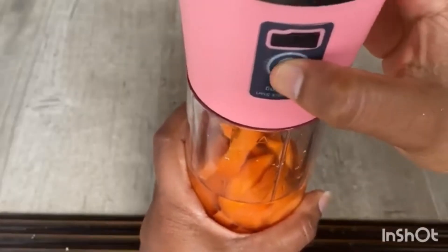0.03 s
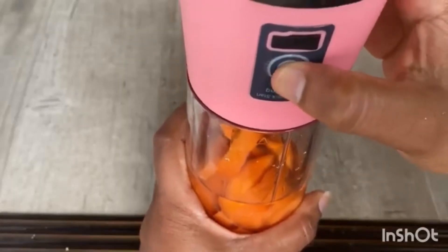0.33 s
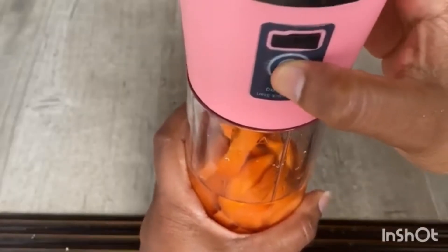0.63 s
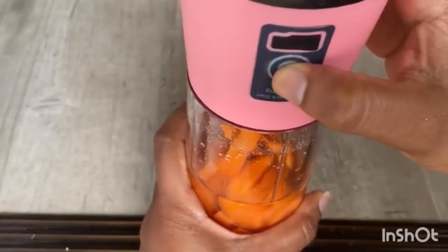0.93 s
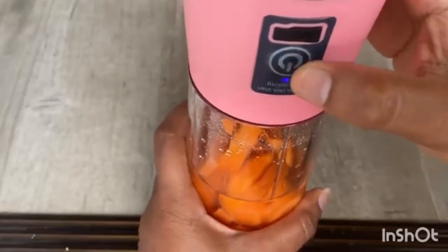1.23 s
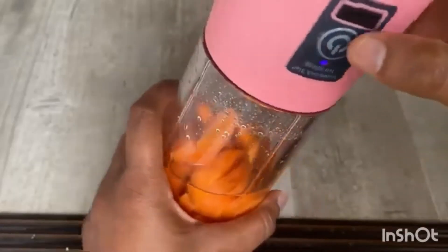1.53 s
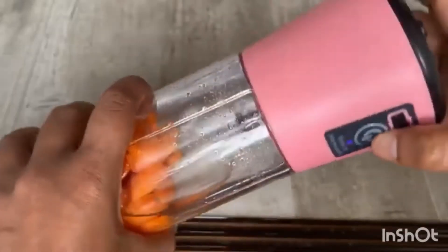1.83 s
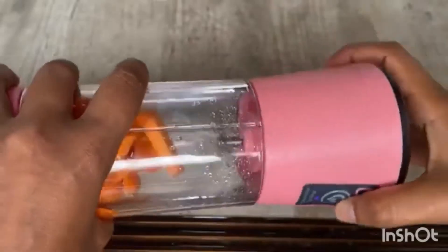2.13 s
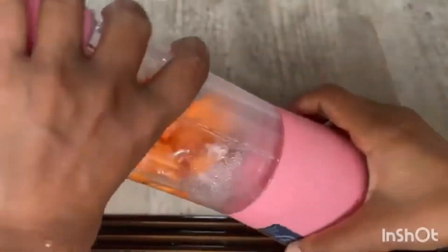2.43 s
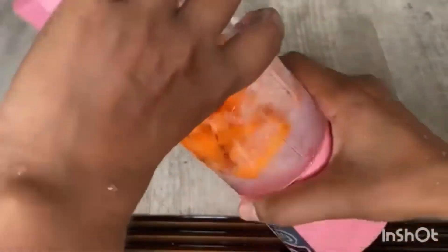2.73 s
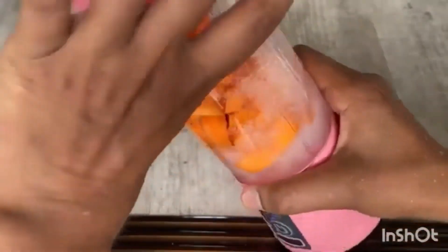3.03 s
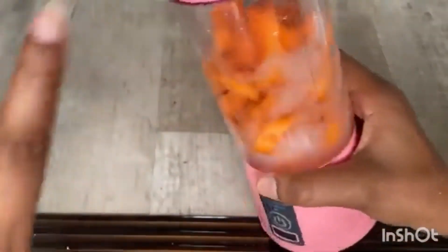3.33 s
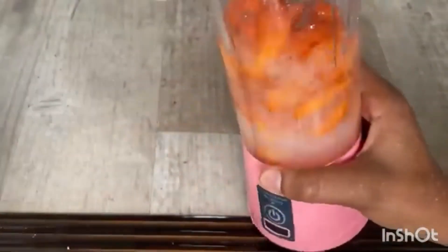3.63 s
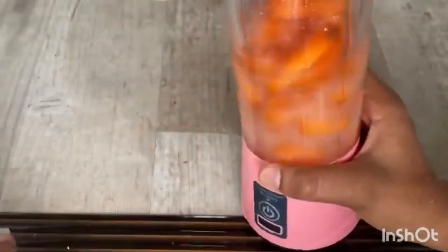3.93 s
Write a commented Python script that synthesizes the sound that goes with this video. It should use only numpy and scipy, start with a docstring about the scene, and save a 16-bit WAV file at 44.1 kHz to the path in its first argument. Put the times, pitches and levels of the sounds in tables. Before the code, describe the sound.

Close up in a quiet room, a portable blender starts after three button clicks. Its rising whine holds steady, then sinks into a harsh buzz as fruit meets the blades, which chop and slosh it around the plastic jar.

```python
"""A quiet room, with a small cordless blender held close to the microphone. Its button clicks three times,
then the motor whines up and spins free: unbalance hums, the commutator sings through the case.
As the jar is tipped over, fruit reaches the blades, which rattle against it and drag the speed down.
Finally they chop and churn the pieces, and the pulp bubbles, gulps and sloshes in the plastic jar."""
import sys
import numpy as np
from scipy import signal
from scipy.fft import rfft, irfft
from scipy.io import wavfile
from scipy.ndimage import uniform_filter1d

SR = 44100
rng = np.random.default_rng(int(sys.argv[2]) if len(sys.argv) > 2 else 0)


def dump(signal):
    """Clip the signal to [-1, 1] and save it as 16-bit WAV at the path in sys.argv[1]."""
    limited = np.clip(np.atleast_2d(signal).T, -1, 1)
    pcm = np.round(limited * 32767).astype(np.int16)
    wavfile.write(sys.argv[1], SR, pcm)


N = 176400
T = np.arange(N) / SR
HZ = np.fft.rfftfreq(N, 1 / SR)

# Fader rides, one for each layer. Each row: time in seconds, relative level in dB.
HANDLING_RIDE = [(1.2, -71.5), (1.55, -67), (2.2, -66.5), (2.45, -61.5), (4, -59)]
HUM_RIDE = [(.8, -32), (.86, -23), (1, -12), (1.5, -3), (2.15, -2), (2.6, -11), (3, -7), (3.3, -16)]
WHINE_RIDE = [(.8, -40), (.94, -16), (1.02, -3), (1.2, 1), (1.5, -0.5), (2.1, -1), (2.35, -10), (3, -25)]
BRUSH_RIDE = [(.79, -85), (.82, -62), (.86, -51), (.94, -47), (1.02, -52), (1.15, -60), (1.4, -61),
              (1.55, -66), (2, -66), (2.2, -55), (4, -56)]
LOW_RING_RIDE = [(1, -71), (1.35, -67), (1.47, -53), (1.8, -51.5), (2, -64), (2.2, -59)]  # the case sings near 3.2 kHz as it tilts
HIGH_RING_RIDE = [(.95, -74), (1.05, -58), (1.33, -53), (1.5, -44), (1.76, -45), (1.84, -51), (1.94, -43),
                  (2.2, -55)]  # and near 5.3 kHz
GROAN_RIDE = [(.83, -28), (.86, -8), (1.1, -30), (2.1, -28), (2.25, 0), (2.5, 0), (2.68, -20), (4, -30)]
GROWL_RIDE = [(2.1, -41), (2.28, -18), (2.45, -8), (2.6, 4), (2.7, 2), (2.8, -2.5), (2.95, 1), (3.06, -2),
              (3.15, -24), (4, -14)]
BUZZ_RIDE = [(2.05, -45), (2.25, -16), (2.4, -13), (2.5, -4), (2.6, 0), (2.7, 0), (2.79, -3), (2.88, -1),
             (2.97, -2), (3.06, -7), (3.15, -24), (4, -28)]
SCRAPE_RIDE = [(2.02, -100), (2.09, -53), (2.19, -46.5), (2.28, -37.5), (2.35, -36.5), (2.41, -45),
               (2.44, -26.5), (2.47, -43), (2.49, -26), (2.51, -50), (2.535, -34), (2.57, -39.5),
               (2.66, -42.5), (2.78, -37), (2.9, -39.5), (3, -34), (3.09, -34), (3.16, -58), (4, -59)]
CHURN_RIDE = [(2.95, -46.5), (3.06, -36), (3.085, -29), (3.115, -33.5), (3.15, -41.5), (3.18, -39),
              (3.205, -33.5), (3.235, -36), (3.3, -32), (3.355, -35), (3.39, -32.5), (3.44, -31.5),
              (3.465, -37.5), (3.515, -33.5), (3.545, -36), (3.575, -32.5), (3.625, -34.5), (3.69, -33.5),
              (3.735, -29.5), (3.795, -37.5), (3.84, -32.5), (3.89, -34.5), (3.95, -33.5), (4, -41.5)]
SLOSH_RIDE = [(2.1, -68.5), (2.45, -47.5), (2.55, -60), (3.06, -58), (3.115, -29.5), (3.16, -48),
              (3.4, -34), (3.49, -52), (3.575, -33), (3.66, -38.5), (3.735, -27), (3.79, -39), (3.84, -34),
              (4, -40.5)]

# EQ curves of the sources and the bodies they ring. Each row: frequency in Hz, relative gain in dB.
RUMBLE_EQ = [(20, -15.5), (32, 2), (48, -4.5), (85, -1.5), (150, -8), (300, -16), (600, -29), (2000, -32),
             (5000, -37.5), (7000, -30.5), (8000, -45), (10000, -47), (12000, -81), (16000, -52)]
HANDLING_EQ = [(20, -31), (35, -37), (52, -1), (90, -3.5), (200, -8.5), (400, -45.5), (2000, -92)]
BUTTON_EQ = [(200, -39), (900, -9), (1800, -6.5), (2320, 8), (2900, -2.5), (3700, -2), (5200, 8),
             (6000, -0.5), (6900, 2), (8000, -10), (10300, -13), (12000, -29), (16000, -24)]
CASE_EQ = [(100, -9), (450, 11), (1050, 4.5), (1800, -4.5), (4000, -1.5), (4900, 8), (5270, 20.5),
           (5700, 13.5), (6800, 2), (8300, 1.5), (10500, -2.5), (12000, -8.5), (15000, -13.5)]
BRUSH_EQ = [(100, -20), (500, -22), (1800, -32), (2600, -24), (4200, -18), (5600, -4), (6700, -1),
            (8200, 1), (10300, -7), (12000, -11), (15000, -16)]
JAR_WALL_EQ = [(2800, -1), (4700, 0.5), (6700, 1.5), (8000, 7), (9000, 9.5), (9500, -22), (10300, -5),
               (11000, -55)]  # muffles the very top of the buzz
JAR_CAVITY_EQ = [(50, -24.5), (130, -11.5), (310, -15), (380, -5), (435, 9), (495, 7), (550, 3), (640, 11),
                 (780, 5), (950, 1), (1400, 1.5), (2000, -14), (4000, -25), (15000, -55)]
SCRAPE_EQ = [(100, -16.5), (400, -26.5), (900, -16.5), (1800, -16), (2500, -8.5), (3200, -2.5), (3800, -6),
             (5200, -8), (6800, -5), (8600, -8.5), (9500, -6.5), (10400, -15.5), (11200, -41),
             (15000, -33.5)]
CHURN_EQ = [(40, -11), (110, -6.5), (300, -7), (480, 2), (750, -9), (1000, -6), (1700, -3.5), (2600, 0.5),
            (3200, -2.5), (3750, -6), (5000, -4), (5900, -3), (7000, -5.5), (8500, -4.5), (9600, -8.5),
            (10800, -28.5), (15000, -40.5)]

# Phase between the two microphone ports. Each row: frequency in Hz, lead of the left in radians.
PORT_PHASE = [(20, 0), (130, 0), (450, .3), (760, 1.5), (900, 3.6), (1030, 5.9), (2000, 6.3), (3000, 7),
              (3800, 6.6), (6700, 6.25), (8100, 4.2), (8500, 3), (9700, 0), (10600, -.1), (11500, -3),
              (12700, -3.4), (13400, -6.3), (16000, -6.5)]
# Balance between the ports. Each row: frequency in Hz, left minus right in dB.
PORT_BALANCE = [(100, -.4), (220, 3), (380, -3), (500, -3), (750, 1.5), (1290, -1), (2300, 2), (4400, 1.3),
                (8000, .6), (15000, 0)]
# Resonances of the plastic jar. Each row: centre in Hz, width in Hz, full lift in dB.
JAR_MODES = [(1458, 41, 7), (2243, 47, 11), (3343, 115, 14), (4160, 250, 12), (5120, 100, 9.5),
             (5994, 106, 11), (7600, 67, 5), (8300, 160, 7.5)]
# The pitch curve of motor and blades. Each row: time in seconds, shaft speed in turns per second.
SHAFT_SPEED = [(.8, 15), (.83, 95), (.86, 160), (.9, 220), (.95, 262), (1, 290), (1.05, 310), (1.1, 323),
               (1.17, 333), (1.25, 340.8), (1.4, 348), (1.55, 351), (2.1, 351.5), (2.16, 347.3),
               (2.22, 336.4), (2.364, 305.2), (2.51, 285), (2.568, 269), (2.656, 250.1), (2.7, 246.5),
               (2.838, 256.6), (2.902, 258.8), (2.944, 256.2), (2.992, 246.3), (3.04, 226), (3.13, 170),
               (3.22, 190), (3.36, 165), (3.43, 138), (3.56, 172), (3.7, 135), (4, 145)]
# Harmonics of motor, groan and blade growl. Each row: multiple of shaft speed, relative level in dB.
MOTOR_PARTIALS = [(1, -41.5), (2, -69), (3, -54), (4, -64), (5, -59), (6, -55), (7, -57), (8, -59),
                  (10, -56), (11, -63), (12, -60), (13, -65), (14, -66), (16, -67), (17, -67), (18, -63),
                  (19, -62), (20, -64), (21, -60), (22, -58), (23, -54), (24, -53), (25, -53), (26, -59),
                  (27, -54), (29, -65), (30, -60), (31, -61), (32, -64), (33, -60), (34, -63), (35, -60),
                  (36, -60), (37, -58), (39, -61), (41, -64)]
GROAN_PARTIALS = [(2, -50.5), (3, -58.5), (4, -56.5), (5, -62), (6, -77)]
GROWL_PARTIALS = [(2, -63), (3, -57), (4, -56), (5, -48), (6, -58), (7, -51), (8, -54), (9, -53), (10, -48),
                  (11, -50)]

# Button clicks. Each row: start in seconds, level in dB, brightness tilt in dB per octave.
CLICKS = [(0.145, -21, -2.5), (0.5808, -13.5, 2), (0.7933, -20, -3)]
# Dry bearing squeals. Each row: start and length in seconds, centre and width in Hz, level in dB.
SQUEALS = [(0.804, 0.17, 5830, 400, -46.5), (0.855, .11, 2980, 300, -53.5), (.87, .12, 8250, 400, -53)]
# Fruit sliding along the jar, and bouncing off the blades.
# Each row: start in seconds, length in seconds, level in dB.
SLIDES = [(1.272, .025, -55), (1.3, .18, -60)]
BOUNCES = [(2.2, .025, -45), (2.478, 0.023, -34), (2.521, 0.02, -33)]
# The load hits the jar. Each row: start in seconds, level in dB, pitch in Hz, time to peak in seconds.
THUDS = [(1.27, -57, 128, 0.017), (2.395, -27.5, 140, 0.0021), (2.44, -48.5, 131, 0.021),
         (3.105, -40, 127.5, 0.019), (3.286, -40.5, 123, 0.017), (3.9, -40, 124, 0.015)]
# Air gulps through the pulp. Each row: start and length in seconds, first and last pitch in Hz, level in dB.
GULPS = [(3.085, .05, 660, 420, -33), (3.722, .03, 640, 480, -30)]
# A blade cracks into a firm piece. Each row: start in seconds, relative level in dB.
CHOPS = [(3.0829, -7.5), (3.201, -8.5), (3.437, -5), (3.562, -7.5), (3.6483, -7.5), (3.708, -14),
         (3.7206, -18), (3.7398, -11), (3.749, -19), (3.836, -11), (3.861, -8.5), (3.877, -7.5),
         (3.914, -11.5), (3.950, -11.5)]


def amp(db):
    """Decibels to gain."""
    return 10 ** (np.asarray(db) / 20)


def unit(x):
    """Normalises to rms 1."""
    return x / np.sqrt(np.mean(x ** 2) + 1e-20)


def fader(ride):
    """Gain over time along a ride, silent before its first point."""
    return amp(np.interp(T, *np.transpose(ride), left=-140))


def swell(start, length):
    """A half-sine fade in and out."""
    return np.sin(np.pi * np.clip((T - start) / length, 0, 1))


def curve_at(curve, hz):
    """Reads a curve on a log-frequency axis."""
    knots_hz, values = np.transpose(curve)
    return np.interp(np.log(hz + 1), np.log(knots_hz + 1), values)


def place(mix, start, sound):
    """Drops a sound into the mix at a time in seconds."""
    part = mix[round(start * SR):][:len(sound)]
    part += sound[:len(part)]


def drift(rate_hz):
    """A smooth random wobble of rms 1."""
    return unit(irfft(rfft(rng.standard_normal(N)) * np.exp(-(HZ / rate_hz) ** 2), N))


def equalise(x, eq):
    """A minimum-phase EQ that keeps white noise at the same power."""
    log_gain = np.log(amp(curve_at(eq, abs(np.fft.fftfreq(4096, 1 / SR)))))
    taps = np.fft.ifft(np.exp(np.conj(signal.hilbert(log_gain)))).real[:2048]
    return signal.oaconvolve(x, taps / np.linalg.norm(taps))[:N]


def partial(order, turns, wander_db, rate_hz):
    """One harmonic of the shaft, wavering in level and phase."""
    knots = np.arange(0, 5, 1 / rate_hz)
    size, slip = rng.standard_normal((400, 2))[:len(knots)].T
    angle = 2 * np.pi * (order * turns + rng.random()) + np.interp(T, knots, slip * (amp(wander_db) - 1))
    return np.sqrt(2) * np.interp(T, knots, amp(wander_db * size)) * np.cos(angle)


def grit(turns, pulsing, grain_db):
    """Tiny impacts of uneven size, swelling once in every turn."""
    sizes = amp(grain_db * np.minimum(rng.exponential(1, N), 5)) * (rng.random(N) < .15)
    pulse = np.exp(2 * pulsing * np.cos(2 * np.pi * turns))
    return unit(sizes * rng.standard_normal(N) * pulse)


def room_rumble(level_db=-67.5):
    """The low, steady bed of the room."""
    return amp(level_db) * equalise(rng.standard_normal(N), RUMBLE_EQ)


def room_tail(x, wet_db=-13, low_t60_s=.3, treble_t60_s=.35):
    """A faint short reverb with the bass rolled off, different at each port."""
    send = signal.lfilter(*signal.butter(1, 250, "high", fs=SR), x)
    t = T[:SR // 2]
    echoes = rng.standard_normal((2, len(t))) * (rng.random((2, len(t))) < .1) * (t > .004)
    low = signal.lfilter(*signal.butter(1, 3000, fs=SR), echoes)
    tail = low * amp(-60 * t / low_t60_s) + (echoes - low) * amp(-60 * t / treble_t60_s)
    return amp(wet_db) * signal.fftconvolve(send[None], tail / np.linalg.norm(tail[0]), axes=1)[:, :N]


def ports(x):
    """Two spaced microphone ports hear the close sound with different phase and level."""
    hz = np.fft.rfftfreq(2 * N, 1 / SR)
    lean = amp(curve_at(PORT_BALANCE, hz) / 2) * np.exp(.5j * curve_at(PORT_PHASE, hz))
    return irfft(rfft(x, 2 * N) * np.array([lean, 1 / lean]))[:, :N]


def handling():
    """Hands shift on the jar with a dull rumble."""
    return fader(HANDLING_RIDE) * equalise(rng.standard_normal(N), HANDLING_EQ)


def button(rise_s=.0008, snap_s=.0016, ring_s=.005, ring_db=-15):
    """The switch snaps and the plastic case rings for a few milliseconds."""
    out, t = np.zeros(N), T[:SR // 20]
    envelope = np.minimum(t / rise_s, 1) * (np.exp(-t / snap_s) + amp(ring_db) * np.exp(-t / ring_s))
    for start, db, tilt in CLICKS:
        tilted_eq = [(hz, gain_db + tilt * np.log2(hz)) for hz, gain_db in BUTTON_EQ]
        snap = equalise(envelope * rng.standard_normal(len(t)), tilted_eq)
        place(out, start, amp(db) * snap / np.linalg.norm(snap))
    return out


def bearing_squeal():
    """The bearing rasps in three narrow bands as the shaft spins up."""
    out = np.zeros(N)
    for start, length, hz, width_hz, db in SQUEALS:
        band = unit(irfft(rfft(rng.standard_normal(N)) / (1 + ((HZ - hz) / width_hz) ** 2) ** 2, N))
        out += amp(db) * band * swell(start, length)
    return out


def jar_lift(hz):
    """The boost in dB that the jar's resonances give each frequency."""
    return sum(db / (1 + (2 * (hz - centre) / width) ** 2) for centre, width, db in JAR_MODES)


def in_jar(eq, resonance):
    """An EQ curve with only a share of the jar's lift on it, since pulp damps the plastic."""
    hz = np.arange(0, SR / 2, 10)
    return np.transpose([hz, curve_at(eq, hz) + resonance * jar_lift(hz)])


def thuds():
    """Soft low knocks of the load shifting in the jar."""
    out, t = np.zeros(N), T[:SR // 4]
    for start, db, hz, peak_s in THUDS:
        envelope = t / peak_s * np.exp(1 - t / peak_s)
        place(out, start, amp(db) * envelope * np.sin(2 * np.pi * hz * t))
    return out


def gulps():
    """Pockets of air ring briefly and sink in pitch as they open."""
    out = np.zeros(N)
    for start, length, first_hz, last_hz, db in GULPS:
        hz = np.linspace(first_hz, last_hz, round(length * SR))
        place(out, start, amp(db) * np.hanning(len(hz)) * np.sin(2 * np.pi * np.cumsum(hz) / SR))
    return out


def bubbles(per_second=1300, sizes=30, decay_cycles=8, rise=.04):
    """Small bubbles in the pulp: short rising blips of many sizes."""
    out = np.zeros(N)
    for hz in np.geomspace(600, 6000, sizes):
        age = T[:SR // 20] * hz / decay_cycles
        blip = np.exp(-age) * np.sin(2 * np.pi * decay_cycles * age * (1 + rise * age))
        triggers = rng.random(N) < per_second / sizes / SR
        pops = triggers * amp(4 * np.minimum(rng.exponential(1, N), 3))
        out += signal.oaconvolve(pops, blip / np.linalg.norm(blip))[:N]
    return unit(out)


def slosh(turns, width=.65):
    """Liquid rings the cavity of the jar, wide in stereo with the bass centred."""
    mid, side = [equalise(grit(turns, pulsing=.4, grain_db=3), JAR_CAVITY_EQ) for _ in range(2)]
    side = signal.lfilter(*signal.butter(2, 330, "high", fs=SR), side)
    return fader(SLOSH_RIDE) * (mid + width * np.array([side, -side])) / np.sqrt(2)


def churn(turns, lump_db=1.3, bubble_db=-4, chop_decay_s=.003, chop_spike=3.3):
    """Fruit tears in uneven lumps, with bubbles and single harder cracks, all heard through the jar."""
    tearing = unit(grit(turns, pulsing=.25, grain_db=1.3) * amp(lump_db * drift(61)))
    pulp = fader(CHURN_RIDE) * unit(tearing + amp(bubble_db) * bubbles())
    t = T[:800]
    for start, db in CHOPS:
        crack = rng.standard_normal(len(t)) * np.exp(-t / chop_decay_s) - chop_spike * (t == 0)
        place(pulp, start, amp(db) * crack / np.linalg.norm(crack))
    return equalise(pulp, in_jar(CHURN_EQ, resonance=.52))


def buzz_partial(order, speed, turns, roughest_order=40, flutter_hz=245):
    """One harmonic of the blade strikes; uneven strikes smear the higher ones into spray."""
    rough = min(order / roughest_order, 1) * .75
    knots = np.arange(0, 5, 1 / flutter_hz)
    cos_gain, sin_gain = [np.interp(T, knots, size) for size in rng.standard_normal((2, len(knots)))]
    angle = 2 * np.pi * order * turns
    spray = unit(cos_gain * np.cos(angle) + sin_gain * np.sin(angle))
    tone = partial(order, turns, wander_db=3, rate_hz=35)
    jar_gain = amp(curve_at(JAR_WALL_EQ, order * speed) + jar_lift(order * speed))
    return jar_gain * (np.sqrt(1 - rough ** 2) * tone + rough * spray)


def blades(speed, turns, buzz_trim_db=-47.5, full_buzz_speed=245):
    """The blades graze the fruit in every turn: a growl, a harsh buzz that needs speed, a wet scrape."""
    growl = sum(amp(db + jar_lift(order * speed)) * partial(order, turns, wander_db=3, rate_hz=43)
                for order, db in GROWL_PARTIALS)
    buzz = amp(buzz_trim_db) * sum(buzz_partial(order, speed, turns) for order in range(12, 43))
    buzz *= np.minimum(abs(speed) / full_buzz_speed, 1) ** 4
    touches = sum(amp(db) * swell(start, length) for start, length, db in BOUNCES + SLIDES)
    scrape = equalise(grit(turns, pulsing=.3, grain_db=.9), in_jar(SCRAPE_EQ, resonance=.5))
    return fader(GROWL_RIDE) * growl + fader(BUZZ_RIDE) * buzz + (fader(SCRAPE_RIDE) + touches) * scrape


def shaft(free_jitter=.0008, loaded_jitter=.006):
    """Speed and running count of turns; the shaft runs less evenly once fruit is in the way."""
    speed = uniform_filter1d(np.interp(T, *np.transpose(SHAFT_SPEED)), size=900)
    contact = fader(SCRAPE_RIDE)
    load = np.clip(contact / contact.max() * 2, 0, 1)
    speed *= 1 + free_jitter * drift(17.3) + loaded_jitter * load * drift(156)
    return speed, np.cumsum(speed) / SR


def case_ring(turns, release_db_per_s=60):
    """Two harmonics sing out in the case as it tilts, and die away when their rides end."""
    out = np.zeros(N)
    for order, ride in ((9, LOW_RING_RIDE), (15, HIGH_RING_RIDE)):
        release = amp(-release_db_per_s * np.maximum(T - ride[-1][0], 0))
        out += fader(ride) * release * partial(order, turns, wander_db=1, rate_hz=25)
    return out


def motor(speed, turns):
    """Unbalance hums, the commutator whines, the brushes hiss, and a hard pull makes the motor groan."""
    def through_case(partials, wander_db, rate_hz):
        """Shaft harmonics sweeping through the resonances of the case."""
        return sum(amp(db + curve_at(CASE_EQ, order * speed)) * partial(order, turns, wander_db, rate_hz)
                   for order, db in partials)
    fundamental = amp(MOTOR_PARTIALS[0][1]) * partial(1, turns, wander_db=.4, rate_hz=13)
    hum = fundamental + through_case(MOTOR_PARTIALS[1:11], wander_db=2, rate_hz=6)
    whine = through_case(MOTOR_PARTIALS[11:], wander_db=4, rate_hz=15)
    ring = case_ring(turns)
    groan = sum(amp(db) * partial(order, turns, wander_db=2, rate_hz=35) for order, db in GROAN_PARTIALS)
    hiss = equalise(grit(turns, pulsing=.4, grain_db=2), BRUSH_EQ)
    return (fader(HUM_RIDE) * hum + fader(WHINE_RIDE) * whine + ring
            + fader(GROAN_RIDE) * groan + fader(BRUSH_RIDE) * hiss)


def scene():
    """The blender right up front, over a faint bed of room and hands."""
    speed, turns = shaft()
    close = button() + motor(speed, turns) + bearing_squeal()
    close += blades(speed, turns) + churn(turns) + gulps() + thuds()
    bed = room_rumble() + handling()
    return bed + ports(close) + slosh(turns) + room_tail(close)


def record(dry):
    """A low cut at 40 Hz and a steep high cut at 15.1 kHz on the whole mix."""
    low_cut = signal.butter(4, 40, "high", fs=SR, output="sos")
    high_cut = signal.firwin(511, 15100, window=("kaiser", 9), fs=SR)
    return signal.oaconvolve(signal.sosfilt(low_cut, dry), high_cut[None], "same")


dry = scene()
out = record(dry)
dump(out)
```